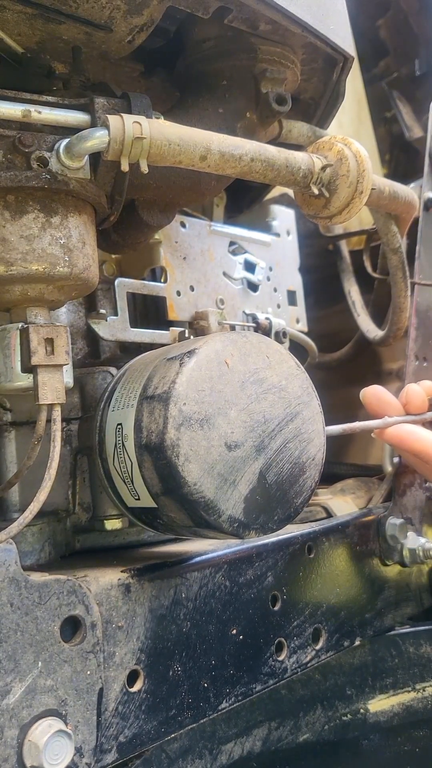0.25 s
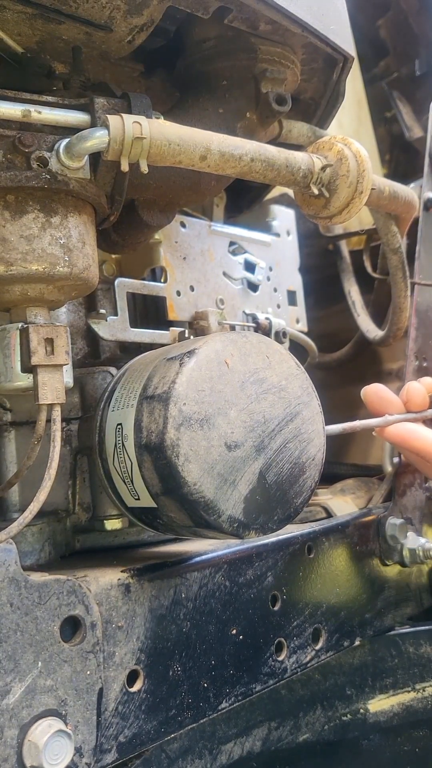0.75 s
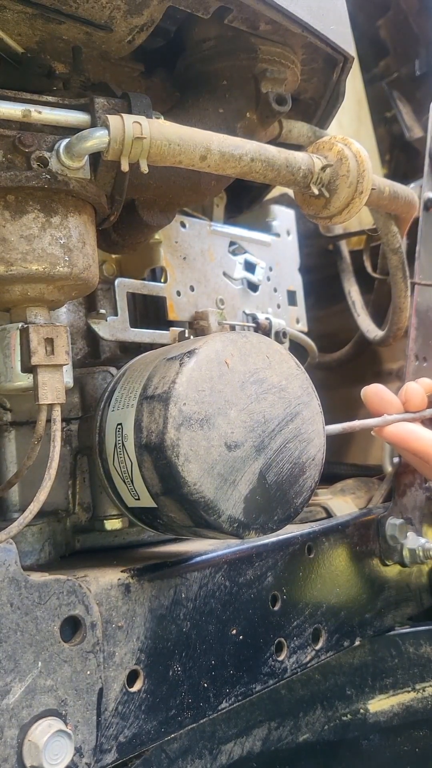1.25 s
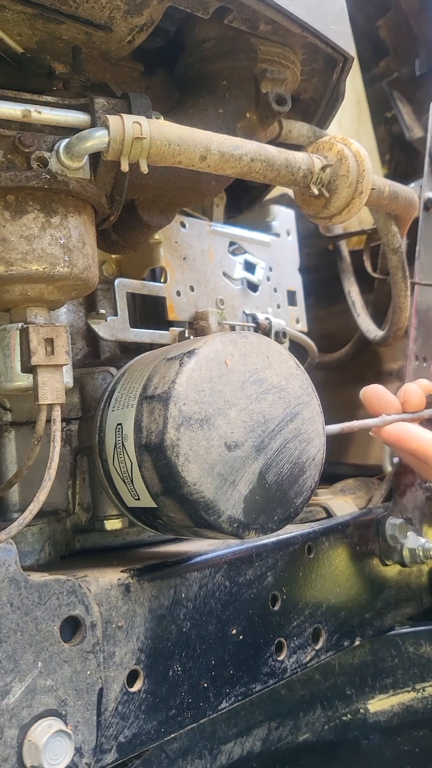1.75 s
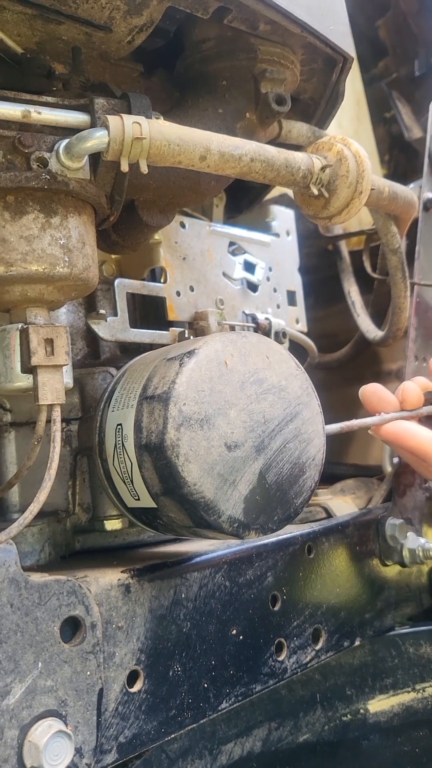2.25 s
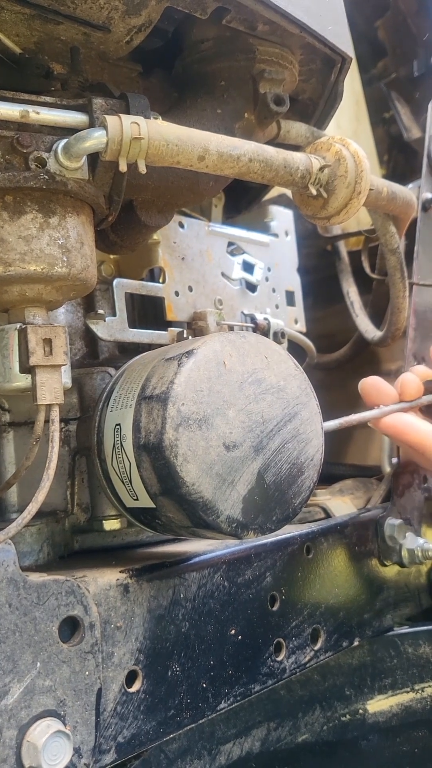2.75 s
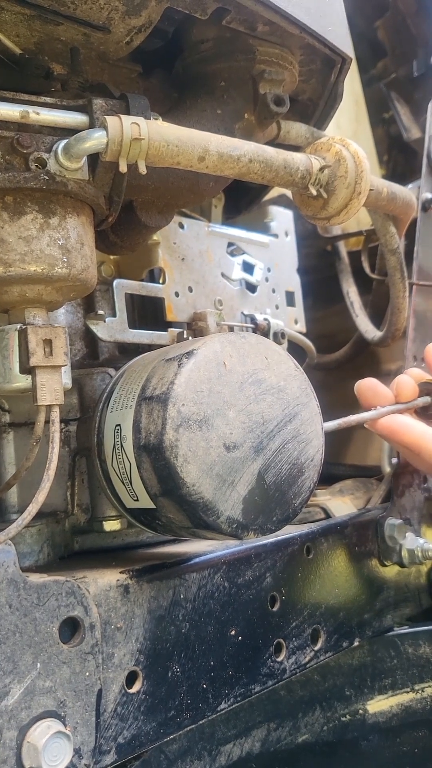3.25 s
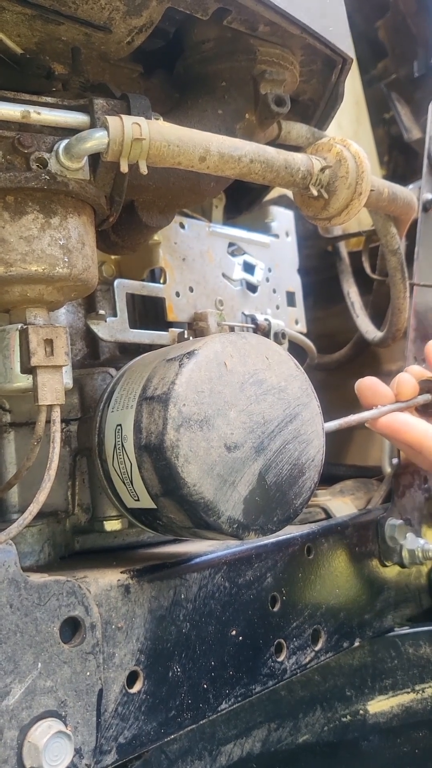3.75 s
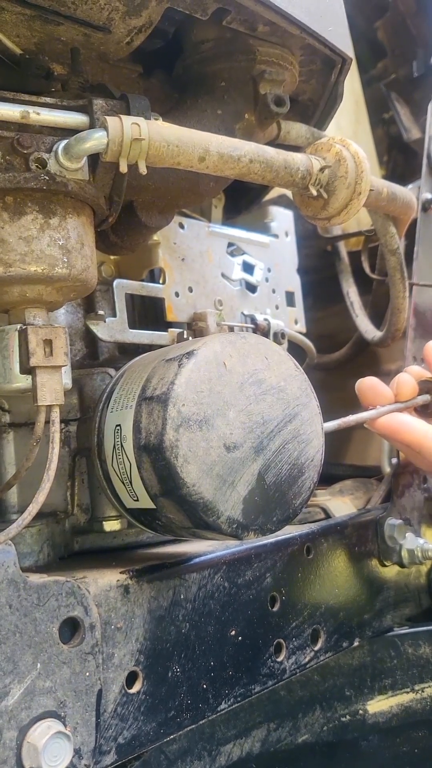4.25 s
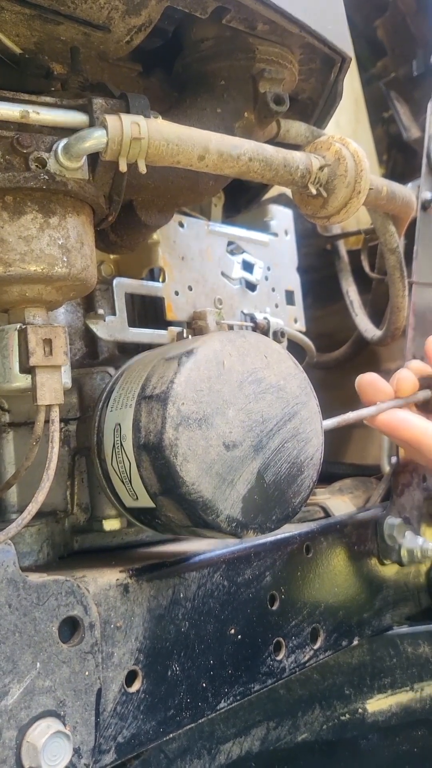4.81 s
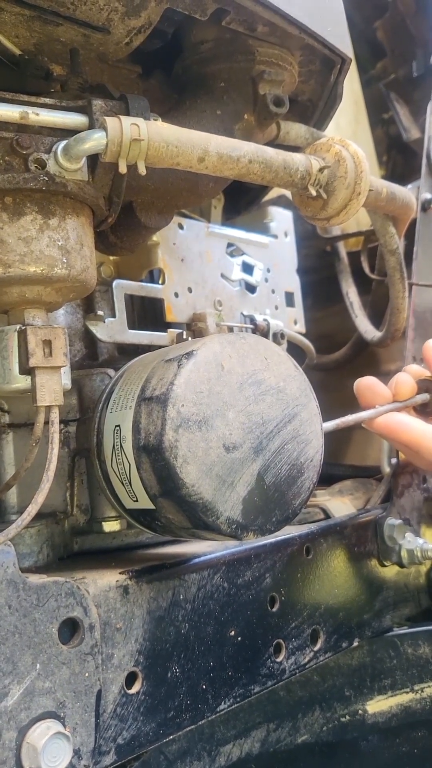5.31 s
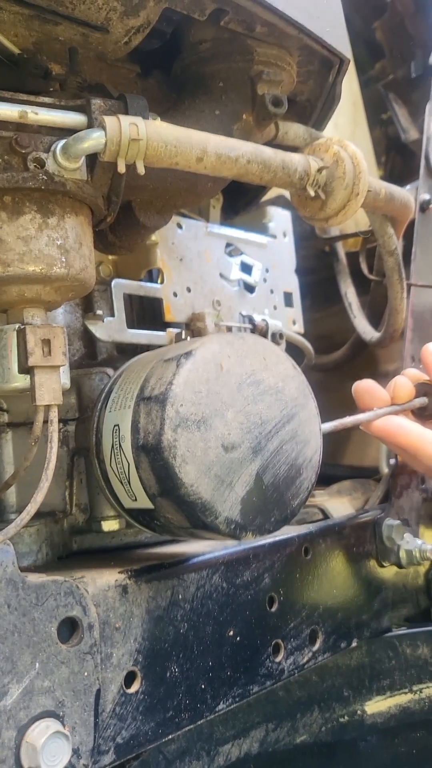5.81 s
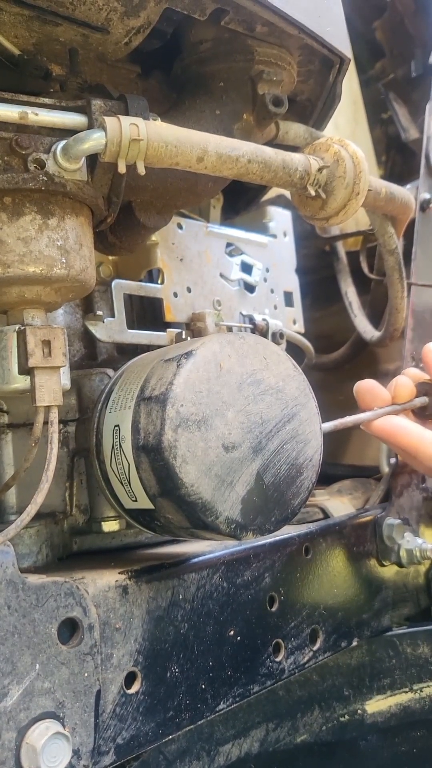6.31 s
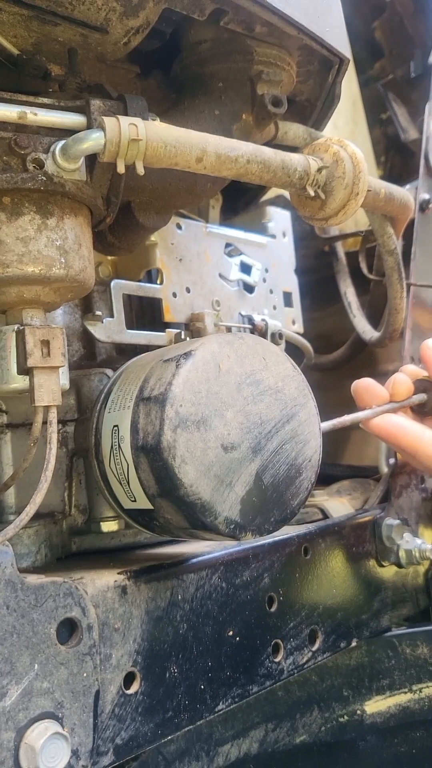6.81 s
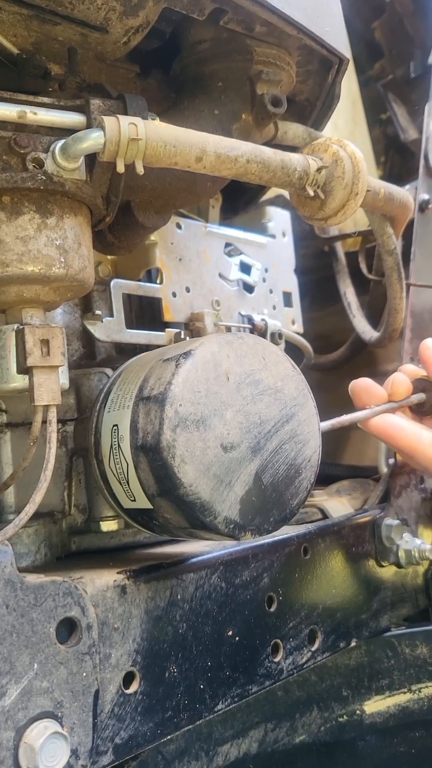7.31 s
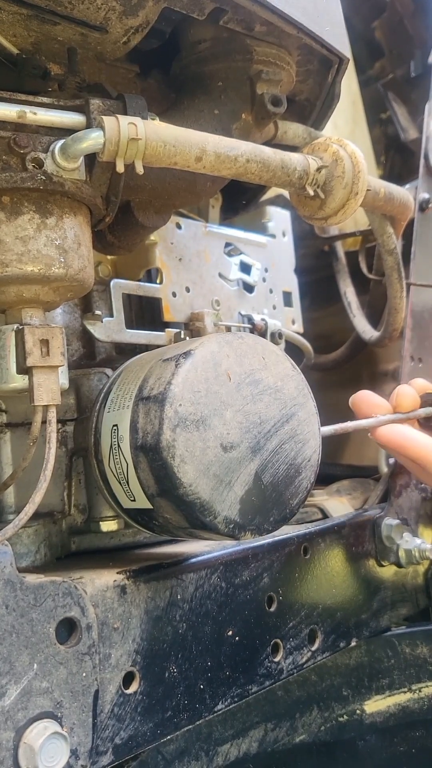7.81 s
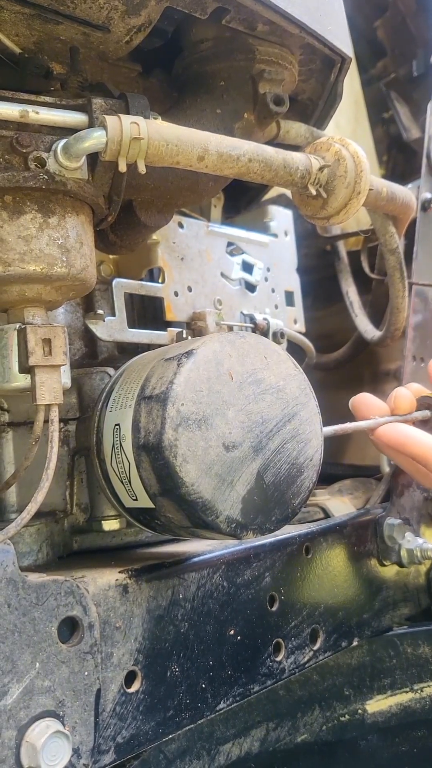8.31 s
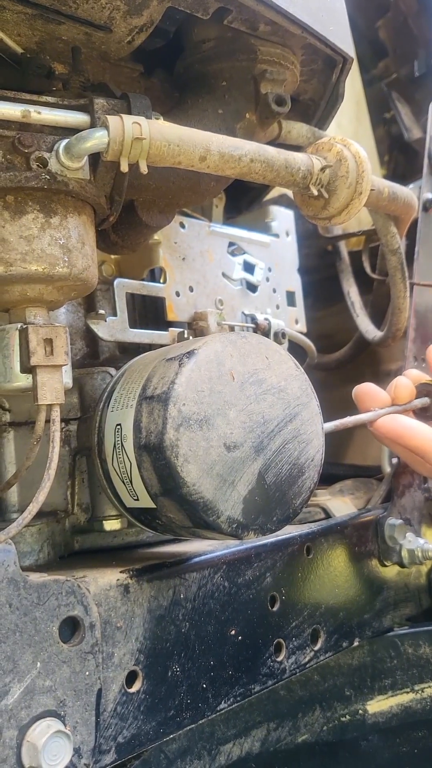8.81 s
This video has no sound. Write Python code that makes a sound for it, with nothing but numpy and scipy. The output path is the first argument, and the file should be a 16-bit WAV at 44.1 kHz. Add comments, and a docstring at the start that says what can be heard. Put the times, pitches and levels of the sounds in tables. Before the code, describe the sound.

A hammer strikes a screwdriver held against a metal oil filter can, close to the microphone in an engine bay. The clanks come unevenly at first, settle into a steady run that grows louder, pause, then end with one hard double hit. Each blow rattles sheet metal and leaves pipes ringing briefly. Distant traffic rumbles softly, and a small bird chirps faintly a few times.

```python
"""Far traffic rumbles under a faint fizz of insects; then hammer blows clank close by, as a screwdriver
is driven against an oil filter can in an engine bay. Each impact excites the crowded modes of the sheet
metal, a clatter, and the separate modes of can, block and tools, while rods and pipes ring on.
Faint ticks fall between the blows and a small bird chips and whistles a few times.
A two-port microphone hears the blows earlier and brighter on the left."""
import sys
import numpy as np
from scipy import signal
from scipy.fft import rfft, irfft, next_fast_len
from scipy.io import wavfile
from scipy.ndimage import uniform_filter1d

SR = 44100
rng = np.random.default_rng(int(sys.argv[2]) if len(sys.argv) > 2 else 0)


def transcribe(u):
    """Save the signal u as a 16-bit wav file named by the first command-line argument.

    u: samples, shape (n,) or (channels, n), limited to [-1, 1]; the rate is SR.
    q: integer samples, one column per channel.
    """
    v = np.clip(np.atleast_2d(u).T, -1, 1)
    q = np.round(v * 32767).astype(np.int16)
    wavfile.write(sys.argv[1], SR, q)


N = 399546

# Hammer blows (force on the can, thud in the block, sharpness of contact, ring of driver and hammer):
# start_s, force_db, thud_db, treble_db, ping_db, hammer_db
BLOWS = [(0.413, -20, -22.5, -8, -46, -60), (1.5359, -23, -27.5, -17, -13, -60),
         (1.7925, -24.5, -24, -27.5, -18, -68), (2.0356, -19.5, -20.5, -1.5, -12, -29),
         (2.7502, -29, -26, -27.5, -50, -68), (2.777, -23.5, -13, -2.5, -49, -49),
         (3.4234, -24.5, -26.5, -24, -39.5, -65), (3.691, -23.5, -24, -17.5, -33, -61),
         (3.9416, -19.5, -21.5, -19.5, -19, -57), (4.581, -17.5, -20.5, -22, -25.5, -58.5),
         (4.8273, -17.5, -31.5, -12.5, -6.5, -40), (4.8956, -30.5, -24.5, -21.5, -52, -69),
         (5.0797, -17, -24, -9, -17.5, -78), (5.1041, -23.5, -14, -4, -34, -48),
         (5.317, -18.5, -23, -10, -14, -37), (5.5613, -21, -25, -18.5, -14, -69),
         (5.8034, -23, -23.5, -22, -29, -67), (6.0326, -22.5, -21, -27.5, -28, -59.5),
         (6.2693, -19, -21, -25.5, -22, -59.5), (6.4998, -17.5, -21, -18.5, -16.5, -54),
         (6.733, -15.5, -18, -17, -18, -50), (6.9524, -15.5, -19, -14.5, -13, -51),
         (7.1726, -14.5, -18.5, -15.5, -14.5, -54), (7.395, -17, -18, -11.5, -14, -36.5),
         (8.8835, -14, -18, -16, -50.5, -71), (8.898, -18, -12.5, -3.5, -47, -41.5)]
# Modes of the loose cover: pitch_hz; and level_db, t60_s
COVER_PITCHES = [940, 660]
COVER_MODES = [(2.5, 0.28), (-4, 0.33)]


def amp(db):
    return 10 ** (np.asarray(db) / 20)


def unit_rms(x):
    return x / np.sqrt(np.mean(x ** 2) + 1e-20)


def curve_at(points, hz):
    """Interpolate (frequency_hz, value) points on a logarithmic frequency axis."""
    frequency, value = np.transpose(points)
    return np.interp(np.log(hz + 1), np.log(frequency + 1), value)


def add(mix, start_s, sound):
    part = mix[..., round(start_s * SR):][..., :sound.shape[-1]]
    part += sound[..., :part.shape[-1]]


def noise_pair(correlation, hz, shape):
    """Partial coherence: left and right noise spectra share a part that depends on frequency."""
    a, b, c, d = rng.standard_normal((4,) + shape)
    left, independent = a + 1j * b, c + 1j * d
    share = np.clip(curve_at(correlation, hz), -1, 1).reshape((-1,) + (1,) * (len(shape) - 1))
    return np.array([left, share * left + np.sqrt(1 - share ** 2) * independent])


def traffic(hz, frame_s):
    """Incoherent sources sum to a wash: its magnitude drifts in patches and swells most in the bass."""
    spectrum = [(22, -43), (35, -27), (55, 5.5), (80, -9.5), (120, -6.5), (240, -15.5), (550, -28.5),
                (1200, -31), (2000, -43), (3200, -55), (7500, -62.5), (12500, -68), (15800, -61),
                (16500, -83)]  # traffic noise: frequency_hz, density_db
    wash_levels = [(0.0, -53), (1.998, -52), (4.001, -54), (7.272, -51), (8.248, -55), (9.06, -50.5)]  # slow swell of the whole wash: time_s, level_db
    rumble_levels = [(0.0, -59), (1.61, -53), (1.89, -48), (3.23, -61), (3.81, -55), (7.37, -55),
                     (8.15, -59.5), (9.06, -54)]  # swell of the deepest rumble: time_s, level_db
    patches = rng.standard_normal((len(hz), len(frame_s)))
    patches = unit_rms(uniform_filter1d(uniform_filter1d(patches, 14, 0), 8, 1))
    wash_db = np.interp(frame_s, *np.transpose(wash_levels))
    rumble_db = np.interp(frame_s, *np.transpose(rumble_levels))
    swell_db = wash_db.mean() + (wash_db - wash_db.mean()) * (0.76 + 0.44 / (1 + (hz / 300) ** 2))
    swell_db += (rumble_db - rumble_db.mean()) / (1 + (hz / 75) ** 4)
    return amp(curve_at(spectrum, hz) + 1.8 * patches + swell_db + 4.0)


def insects(hz, frame_s, centre_hz=10450, width_hz=1500):
    """Amplitude modulation: the magnitude of a narrow treble band throbs quickly and at random."""
    throb_db = 1.9 * unit_rms(rng.standard_normal(len(frame_s)))
    return amp(-103 + throb_db) * np.exp(-((hz - centre_hz) / width_hz) ** 2)


def distant_field():
    """Traffic and insects add in power; the two ports are coherent mainly at long wavelengths."""
    correlation = [(30, .4), (70, .7), (180, .9), (550, .8), (1650, 0.05), (15000, 0.05)]  # likeness of the ports: frequency_hz, correlation
    balance = [(60, 1.8), (1650, -4), (5000, 0), (11000, 9)]  # lean of the distant sound: frequency_hz, left_minus_right_db
    frame_s = np.arange(N // 512 + 5) * 512 / SR
    hz = np.fft.rfftfreq(2048, 1 / SR)[:, None]
    magnitude = np.hypot(traffic(hz, frame_s), insects(hz, frame_s))
    sides = amp(np.array([.5, -.5])[:, None, None] * curve_at(balance, hz))
    spectra = noise_pair(correlation, hz[:, 0], magnitude.shape) * sides * magnitude
    return signal.istft(spectra, nperseg=2048, noverlap=1536)[1][:, :N]


def decay_factors(rebound_s=.04, square_ping_db=-40):
    """Contact damping: a quick rebound chokes a blow's clatter, and a glancing blow shortens it."""
    start_s, ping_db = np.transpose(BLOWS)[[0, 4]]
    choked = np.diff(start_s, append=np.inf) < rebound_s
    return np.where(choked, .44, np.where(ping_db > square_ping_db, 1, 0.71))


def bay_shake_db():
    """Structural coupling: forceful, sharp or steely blows pass more energy to the whole bay."""
    force_db, treble_db, hammer_db = np.transpose(BLOWS)[[1, 3, 5]]
    steely_db = np.maximum(hammer_db + 40, 0)
    return (1.38 + 0.19 * (force_db - force_db.mean())
            + 0.1 * (treble_db - treble_db.mean()) + 0.25 * steely_db)


def sheet_clatter():
    """High modal density: struck sheet metal acts as noise decaying in half-octave bands."""
    spectrum = [(50, -35), (100, -13.5), (170, -8.5), (400, -6), (800, -12), (1200, -8), (2200, -22.5),
                (3500, -27.5), (6500, -30), (8200, -38.5), (11500, -33), (15800, -33), (16600, -57.5)]  # response of the sheet metal: frequency_hz, density_db
    clatter_decay = [(100, 0.41), (300, 0.2), (1000, 0.12), (3000, 0.12), (8000, 0.079), (16000, 0.041)]  # its decay after a square blow: frequency_hz, t60_s
    tail_levels = [(100, -29.5), (400, -19), (1200, -24), (3000, -25.5), (7000, -24), (16000, -10.5)]  # after-ring of the bay: frequency_hz, level_db
    tail_decay = [(100, 1), (400, 0.44), (1200, 0.5), (3000, 0.37), (7000, 0.3), (16000, 0.053)]  # its decay before the shake lengthens it: frequency_hz, t60_s
    correlation = [(60, 0.93), (200, 0.82), (1000, 0.75), (4000, 0.08), (15000, 0.23)]  # likeness of the ports: frequency_hz, correlation
    colour_hz = (350, 1000, 3000, 9000)  # where thud, force, crack and treble set the level
    size = 2 ** 15
    hz, t = np.fft.rfftfreq(size, 1 / SR), np.arange(size) / SR
    early = t[:size // 4]
    colour = amp(curve_at(spectrum, hz))
    responses = np.array([noise_pair(correlation, hz, hz.shape) * colour for _ in range(2)])
    lot = rng.random(hz.shape)
    lasting_share = hz[1] / 28 * (1 + (hz / 5000) ** 2)  # lasting modes crowd together in the treble
    lasting = responses * (lot < lasting_share) / np.sqrt(np.minimum(lasting_share, 1))
    crowd = responses * np.sqrt(np.where(lot < hz[1] / 250, 60 / hz[1], .76))  # a few lead the clank
    spots = .55 * rng.standard_normal(len(BLOWS))  # the point of impact blends the two responses
    blows = list(zip(BLOWS, decay_factors(), bay_shake_db(), spots))
    out = np.zeros((2, N))
    for octave in np.arange(11, 30) / 2:
        band_hz = 2 ** octave
        band = np.cos(np.pi * np.clip(np.log2(hz + 1) - octave, -.5, .5)) ** 2
        dense, sparse = irfft(band * np.array([crowd, lasting]), size)
        rise = 1 - np.exp(-(t / (.0005 + .9 / band_hz)) ** 2)  # treble starts at once, bass swells
        room_t60 = 1.1 / (0.5 + (band_hz / 5000) ** 2)
        for (start_s, force_db, thud_db, treble_db, *_), decay_factor, shake_db, spot in blows:
            crack_db = min(0.5 + 0.77 * treble_db, -6.5)
            sizzle_db = (treble_db + force_db) / 2 - 2.5
            hit_db = curve_at(list(zip(colour_hz, (thud_db, force_db, crack_db, treble_db))), band_hz)
            tail_db = curve_at(list(zip(colour_hz, (thud_db, force_db, crack_db, sizzle_db))), band_hz)
            tail_db += curve_at(tail_levels, band_hz) + shake_db
            tail_t60 = curve_at(tail_decay, band_hz) * amp(0.91 * shake_db / (1 + band_hz / 6000))
            body = amp(-60 * early / (decay_factor * curve_at(clatter_decay, band_hz)))
            snap = amp(-7 - 60 * early / 0.028)  # first contact of steel on sheet
            clank = rise * (np.cos(spot) * dense[0] + np.sin(spot) * dense[1])
            tail = rise * (np.cos(spot) * sparse[0] + np.sin(spot) * sparse[1])
            room_echo = amp(hit_db - 40 - 60 * t / room_t60) * rise * dense[1, ::-1]
            add(out, start_s, amp(hit_db) * (body + snap) * clank[:, :len(early)])
            add(out, start_s, amp(tail_db - 60 * t / tail_t60) * tail + room_echo)
    return amp(67) * out


def ring(pitches_hz, modes, drive_db, t, spread_db):
    """Modal superposition: damped sines, among which each blow shares its force a little differently."""
    level_db, t60 = np.transpose(modes)[:, :, None]
    chance = rng.standard_normal((len(modes), 2))
    envelopes = amp(drive_db + level_db + spread_db * chance[:, :1] - 60 * t / t60)
    return (envelopes * np.sin(2 * np.pi * (np.outer(pitches_hz, t) + chance[:, 1:]))).sum(0)


def can_block_and_cover(force_db, thud_db, decay_factor, t):
    """Resonant build-up: the bodies take milliseconds to answer, the heavy block longest."""
    can_hz = [170, 376, 742, 872, 944, 1003, 1049, 1092, 1150, 1173, 1326, 1429, 1722, 2115, 2180, 3396,
              4290, 5540]  # modes of the filter can: pitch_hz
    can_modes = [(-5, 0.057), (-3, 0.078), (-3, .1), (-7.5, 0.2), (-24, 0.19), (-18, 0.14), (-2.5, 0.14),
                 (-11, 0.09), (-4, 0.18), (-12.5, 0.37), (-1.5, 0.08), (-23, .3), (-19.5, .25), (-21, 0.18),
                 (-17, 0.3), (-25, .2), (-20.5, 0.15), (-21, 0.18)]  # level_db, t60_s
    block_hz = [250, 308, 454, 627, 800, 1361, 1835]  # modes of the engine block: pitch_hz
    block_modes = [(-3.5, 0.15), (-5.5, 0.15), (1, 0.11), (-4, 0.071), (-13, 0.18), (-11, 0.15),
                   (-13, 0.29)]  # level_db, t60_s
    can = ring(can_hz, can_modes, force_db - 8 * (1 - decay_factor), t, spread_db=1.8)
    block = ring(block_hz, block_modes, 1.515 * thud_db + 9.5, t, spread_db=3.1)
    block *= 1 - np.exp(-(t / 0.0069) ** 2)
    cover = ring(COVER_PITCHES, COVER_MODES, force_db - 38, t, spread_db=.8)
    return (can + block + cover) * (1 - np.exp(-t / 0.005))


def tools_and_bracket(ping_db, hammer_db, bracket_db, t):
    """Free vibration of stiff steel: driver, hammer head and bracket ping high, almost at once."""
    driver_hz = [2697, 4090, 4125, 5760]  # modes of the screwdriver: pitch_hz
    driver_modes = [(1.5, 0.069), (-4.5, 0.038), (-41, 0.37), (-13, 0.08)]  # level_db, t60_s
    hammer_hz = [11051, 13180, 6480]  # modes of the hammer head: pitch_hz
    hammer_modes = [(11, .15), (6, 0.11), (-11.5, .4)]  # level_db, t60_s
    bracket_hz = [3011, 3640, 4410]  # modes of the bracket: pitch_hz
    bracket_modes = [(11, 0.38), (-2.5, .2), (-0.5, 0.22)]  # level_db, t60_s
    driver = ring(driver_hz, driver_modes, ping_db, t, spread_db=0.38)
    hammer = ring(hammer_hz, hammer_modes, hammer_db, t, spread_db=0.69)
    bracket = ring(bracket_hz, bracket_modes, bracket_db, t, spread_db=0.95)
    return (driver + hammer + bracket) * (1 - np.exp(-t / 0.00027))


def pipes_and_rod(pipes_db, rod_db, t):
    """Light damping: pipes and a rod lose energy slowly and outlast the clatter."""
    pipe_hz = [431, 501, 550, 659, 1109, 1351]  # modes of the pipes: pitch_hz
    pipe_modes = [(-53, 9.2), (-37, 2.2), (-45, 5.5), (-36, 1.6), (-32, 0.71), (-38.5, 0.57)]  # level_db, t60_s
    rod_hz = [1776]  # mode of the rod: pitch_hz
    rod_mode = [(14, .7)]  # level_db, t60_s
    pipes = ring(pipe_hz, pipe_modes, pipes_db, t, spread_db=2.2)
    rod = ring(rod_hz, rod_mode, rod_db, t, spread_db=.8)
    return (pipes + rod) * (1 - np.exp(-t / .01))


def ringing_parts(skip_s=.1):
    """Impulse excitation: every blow sets the separate parts ringing at their natural frequencies."""
    t, out = np.arange(2 * SR) / SR, np.zeros(N)
    early = t[:SR // 2]
    skips = np.diff(np.transpose(BLOWS)[0], prepend=-np.inf) < skip_s
    for blow, decay_factor, shake_db, skipped in zip(BLOWS, decay_factors(), bay_shake_db(), skips):
        start_s, force_db, thud_db, treble_db, ping_db, hammer_db = blow
        if skipped:  # a quick second strike: the hammer slips past the driver on to the block
            bracket_db, rod_db = -31.5 + .55 * thud_db, 9 + hammer_db
        else:
            bracket_db, rod_db = -18.5 + 0.82 * treble_db + 0.5 * hammer_db, -np.inf
        bodies = can_block_and_cover(force_db, thud_db, decay_factor, early)
        pings = tools_and_bracket(ping_db, hammer_db, bracket_db, early)
        add(out, start_s - .0003, bodies + pings)
        add(out, start_s, pipes_and_rod(force_db + shake_db, rod_db, t))
    return out


def loose_cover():
    """Shock excitation: a few blows jolt the loose cover into its two modes."""
    jolts = [(0.413, -25), (1.7923, -39.5), (7.395, -48.5), (8.898, -43)]  # jolts of the cover: start_s, level_db
    t, out = np.arange(SR // 2) / SR, np.zeros(N)
    rise = 1 - np.exp(-t / 0.00077)
    for start_s, level_db in jolts:
        add(out, start_s, ring(COVER_PITCHES, COVER_MODES, level_db, t, spread_db=0.52) * rise)
    return out


def ticks(t60_s=0.11):
    """Band-limited transients: quickly decaying noise makes faint dry ticks between the blows."""
    bursts = [(.958, -63, 13400, 4000), (3.619, -64.5, 4740, 3050), (4.09, -55.5, 5100, 4980)]  # ticks: start_s, level_db, centre_hz, width_hz
    t, out = np.arange(4096) / SR, np.zeros(N)
    hz = np.fft.rfftfreq(len(t), 1 / SR)
    for start_s, level_db, centre_hz, width_hz in bursts:
        band = np.exp(-((hz - centre_hz) / width_hz) ** 2)
        noise = unit_rms(irfft(rfft(rng.standard_normal(len(t))) * band))
        add(out, start_s, amp(level_db - 60 * t / t60_s) * noise)
    return out


def bird(chip_s=0.013, chip_pitch_ratio=0.68, echo_t60_s=0.51):
    """Frequency modulation: a tone falls steeply in chips or holds in whistles, with an outdoor echo."""
    chips = [(2.33, -70.5, 7450), (2.393, -64.5, 7500), (2.45, -56.5, 7600), (2.521, -64.5, 7170),
             (2.992, -63.5, 7300), (3.083, -62.5, 7300), (3.202, -68, 6400)]  # falling chips: start_s, level_db, start_pitch_hz
    whistles = [(3.283, -62.5, 5800, .018), (6.106, -66.5, 2620, 0.21), (6.377, -64, 2620, 0.17)]  # level notes: start_s, level_db, pitch_hz, length_s
    calls = [(start_s, db, hz, chip_pitch_ratio * hz, chip_s) for start_s, db, hz in chips]
    calls += [(start_s, db, hz, hz, length_s) for start_s, db, hz, length_s in whistles]
    out = np.zeros(N)
    for start_s, level_db, from_hz, to_hz, length_s in calls:
        hz = np.linspace(from_hz, to_hz, round(length_s * SR))
        hz *= 1 + .12 * uniform_filter1d(rng.standard_normal(len(hz)), size=40)  # a slightly husky voice
        add(out, start_s, amp(level_db) * np.hanning(len(hz)) * np.sin(2 * np.pi * np.cumsum(hz) / SR))
    t = np.arange(SR // 5) / SR
    echo = rng.standard_normal(len(t)) * amp(-60 * t / echo_t60_s)
    return out + amp(-9) * signal.oaconvolve(out, echo / np.linalg.norm(echo))[:N]


def microphone_ports(sound):
    """Acoustic shadow and path difference: the housing dulls and delays sound at the right port."""
    shadow = [(60, 3.5), (400, 0.5), (1200, 2), (3000, 0), (7000, 7), (11000, 11.5), (15000, 20.5)]  # loss at the right port: frequency_hz, loss_db
    lag = [(300, 8.5), (1200, 8.34), (3000, 19.74), (16000, 15)]  # right port behind left: frequency_hz, lag_samples
    size = next_fast_len(N + 64)
    hz = np.fft.rfftfreq(size, 1 / SR)
    half_lead = np.exp(1j * np.pi * hz * curve_at(lag, hz) / SR)
    response = np.array([half_lead, amp(-curve_at(shadow, hz)) / half_lead])
    return irfft(rfft(sound, size) * response, size)[:, :N]


def scene():
    """Superposition: blows, ticks and bird pass the housing and add to the distant field."""
    sources = sheet_clatter() + ringing_parts() + loose_cover() + ticks() + bird()
    return microphone_ports(sources) + distant_field()


def record(dry, low_cut_hz=35, high_cut_hz=16800):
    """Soft saturation rounds the loudest peaks; filters then cut the deepest bass and the top treble."""
    saturated = 1.362 * np.tanh(dry / 1.195)
    high_pass = signal.butter(2, low_cut_hz, "high", fs=SR, output="sos")
    low_pass = signal.firwin(255, high_cut_hz, window=("kaiser", 9), fs=SR)
    return signal.oaconvolve(signal.sosfilt(high_pass, saturated), low_pass[None], "same")


dry = scene()
out = record(dry)
transcribe(out)
```